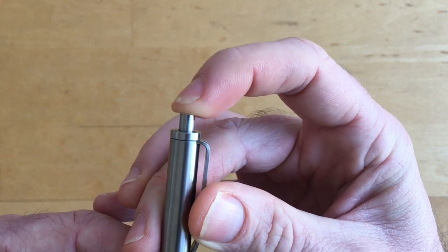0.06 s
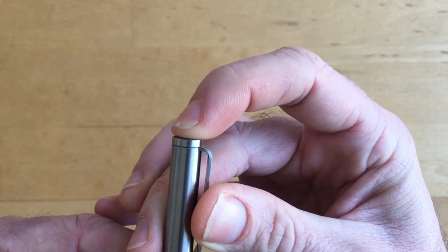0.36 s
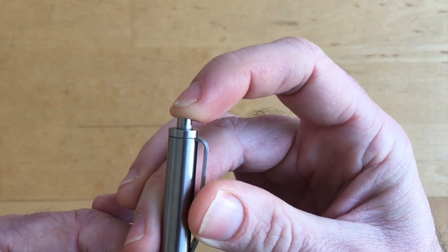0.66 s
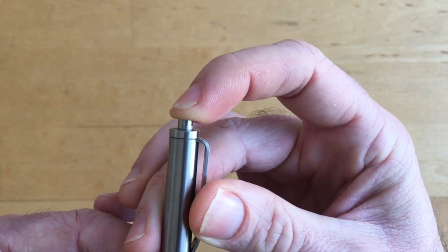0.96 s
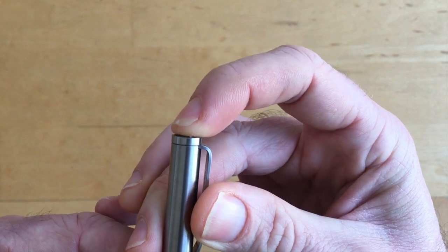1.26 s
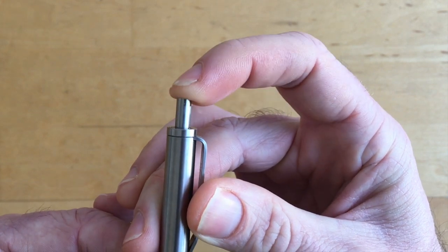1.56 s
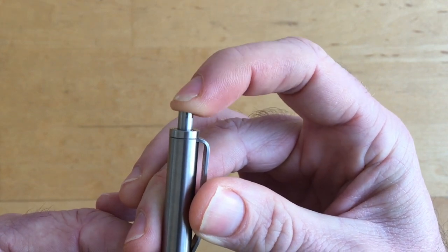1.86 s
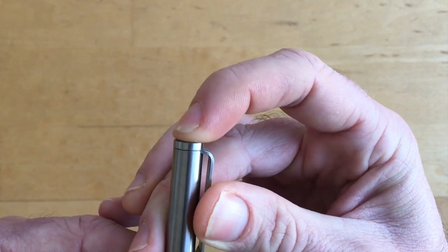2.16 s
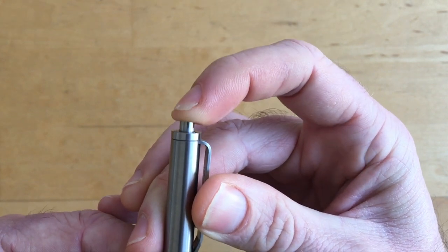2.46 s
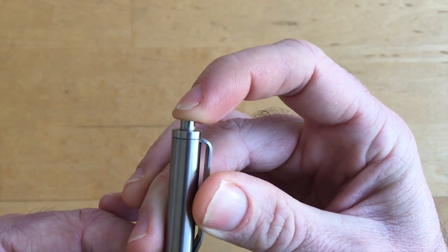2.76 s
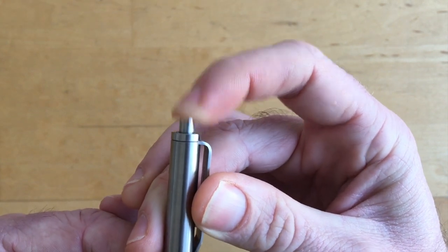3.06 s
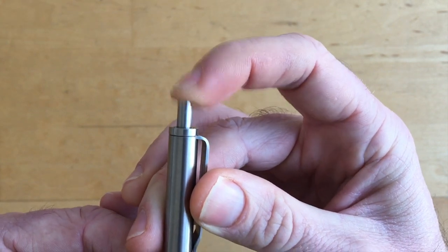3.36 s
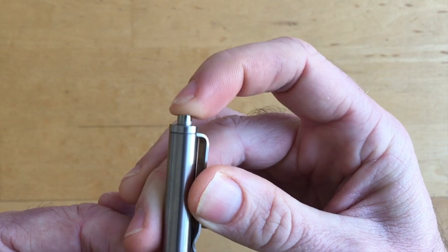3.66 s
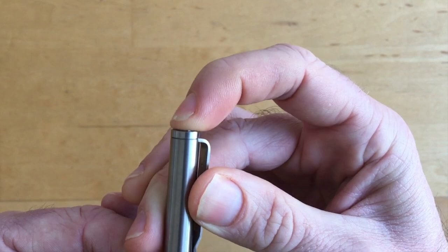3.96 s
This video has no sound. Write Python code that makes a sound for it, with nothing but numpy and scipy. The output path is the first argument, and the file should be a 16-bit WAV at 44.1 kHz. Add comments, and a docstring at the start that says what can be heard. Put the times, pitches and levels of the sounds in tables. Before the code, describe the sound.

Sharp clicks come from a metal pen near the microphone as a finger works the plunger, with brief scrapes and thin sliding hisses in between. The quiet room holds a steady airy rush, a low hum and a drifting rumble.

```python
"""A short scrape and a thin hiss, then a sharp click: a finger works a metal click pen near the mic.
The plunger hisses as it slides and its cam scrapes over the teeth; on release it snaps onto the
latch or jumps to its top stop. Behind it lies a quiet room, heard in mono: a steady rush like
ventilation, a low hum and a rumble that swells and fades."""
import sys
import numpy as np
from scipy import signal
from scipy.fft import rfft, irfft
from scipy.io import wavfile

SR = 44100
rng = np.random.default_rng(int(sys.argv[2]) if len(sys.argv) > 2 else 0)


def file_out(sig):
    """Save sig as 16-bit WAV at sys.argv[1]."""
    # one column per channel
    cols = np.atleast_2d(sig).T
    # limit, then scale
    lim = np.clip(cols, -1, 1)
    pcm = np.round(lim * 32767).astype(np.int16)
    wavfile.write(sys.argv[1], SR, pcm)


N = 176400

# The latch snaps, close up. Each row: start in seconds, level in dB, treble tilt in dB per octave.
LATCH_SNAPS = [(0.577, -51.5, -1), (2.4819, -52.5, 0.5), (3.7306, -54.5, -2)]
# Rebounds, the later one duller. Each row, relative to its snap: delay in seconds, level in dB,
# treble tilt in dB per octave.
LATCH_REBOUNDS = [(.0015, -8, 1), (.0052, -11, -7)]
# The ring of the latch. Each row: frequency in Hz, relative level in dB, seconds to fall 60 dB.
LATCH_RING = [(1700, -1, 0.011), (2530, -16, 0.0089), (3010, -4, 0.0088), (3720, -12, 0.0067),
              (4340, -1.5, 0.0072), (5500, -1.5, 0.0065), (6020, -2.5, 0.0053), (6800, -5, 0.0058),
              (8700, -16, .005), (14000, -11, 0.0044), (15000, -14, .004)]
def latch_clicks(contact_s=0.0006):
    """The cam snaps onto the latch and rebounds twice, ringing the pen each time."""
    out = np.zeros(N)
    for start, db, tilt_db in LATCH_SNAPS:
        add(out, start, amp(db) * struck_pen(LATCH_RING, contact_s, tilt_db, size=512))
        for delay, rebound_db, rebound_tilt_db in LATCH_REBOUNDS:
            rebound = struck_pen(LATCH_RING, contact_s, tilt_db + rebound_tilt_db, size=512)
            add(out, start + delay, amp(db + rebound_db) * rebound)
    return out


# A graze, then the hit on the stop. Each row: start in seconds, level in dB, tilt in dB per octave.
STOP_HITS = [(3.1884, -64, 15), (3.1895, -46, -1)]
# The ring of the stop. Each row: frequency in Hz, relative level in dB, seconds to fall 60 dB.
STOP_RING = [(920, -2.5, .01), (1590, -5, .008), (2050, -1.5, .017), (2250, -4.5, 0.013),
             (3800, -2, 0.0033), (5600, -3.5, 0.0058), (6860, -12, .004), (8900, -12, .004),
             (12200, -10, .003), (13500, -13, .004), (15200, -11, .003)]
def top_stop(contact_s=0.0008):
    """The spring throws the plunger against its stop: a lower, rounder click."""
    out = np.zeros(N)
    for start, db, tilt_db in STOP_HITS:
        add(out, start, amp(db) * struck_pen(STOP_RING, contact_s, tilt_db, size=640))
    return out


def struck_pen(modes, contact_s, tilt_db, size, crack_db=-9.5, crack_s=0.0016):
    """Damped modes of the pen in the hand, struck once, with a brief gritty crack; rms 1."""
    t = np.arange(size) / SR
    hz, db, t60 = np.transpose(modes)[:, :, None]
    polarity = (-1) ** np.arange(len(hz))[:, None]
    decays = amp(db + tilt_db * np.log2(hz / hz.mean()) - 60 * t / t60)
    ring = (polarity * decays * np.sin(2 * np.pi * hz * t)).sum(0)
    crack = amp(crack_db) * colour(rng.standard_normal(size), SCRAPE_SPECTRUM) * np.exp(-t / crack_s)
    attack = np.minimum(t / contact_s, 1)
    return unit((ring + crack) * attack)


# The cam on the teeth, close up. Each row: start in seconds, length in seconds, level in dB,
# barrel resonance in Hz, its level against the scrape in dB.
TOOTH_SCRAPES = [(0.083, 0.0031, -56.5, 3700, -5), (0.086, 0.029, -66.5, 3700, -2),
                 (1.4446, 0.0062, -52.5, 9000, -2), (1.452, 0.0034, -55, 3750, -11),
                 (1.459, 0.0034, -59, 9000, -9), (1.906, 0.0085, -61.5, 6900, -16),
                 (1.929, 0.0099, -62, 3300, -1), (1.956, .005, -67, 6000, -9),
                 (3.1785, .002, -51, 3800, -5), (3.1812, 0.0027, -46.5, 13300, 7.5),
                 (3.476, .0035, -50.5, 6700, -7), (3.479, 0.0051, -53, 7600, -1),
                 (3.483, .003, -64, 10200, -2)]
# The colour of a scrape and of a click's crack. Each row: frequency in Hz, relative level in dB.
SCRAPE_SPECTRUM = [(1200, -25), (2400, -2.5), (3500, 2.5), (4900, -4.5), (5800, -2), (6900, 2), (8100, -8),
                   (9200, -3.5), (11300, -4.5), (13600, -32), (15500, -7.5)]
def cam_scrapes():
    """The cam chatters briefly over a tooth, each scrape favouring one resonance of the barrel."""
    out = np.zeros(N)
    for start, length, db, hz, ring_db in TOOTH_SCRAPES:
        chatter = impulses(per_s=5000)
        barrel = amp(ring_db) * resonance(chatter, hz, width_hz=450)
        scrape = unit(colour(chatter, SCRAPE_SPECTRUM) + barrel)
        add(out, start, amp(db) * stroke(scrape, length, edge_s=0.0011))
    return out


# The plunger's travel, faint even this close. Each row: start and length in seconds, level in dB.
SLIDE_STROKES = [(.073, 0.017, -63), (0.105, .02, -73), (0.173, 0.0094, -63.5), (0.182, .014, -67),
                 (.203, .022, -75), (0.245, 0.016, -67), (0.558, 0.023, -68), (1.143, .014, -67.5),
                 (1.173, .013, -65.5), (1.388, 0.048, -68.5), (1.446, 0.015, -65), (1.898, .016, -64),
                 (1.931, .008, -67), (2.04, 0.017, -65.5), (2.057, .026, -72), (2.114, .012, -64),
                 (2.459, 0.021, -70), (2.932, .014, -66), (2.944, .015, -66), (3.144, 0.031, -67),
                 (3.192, .024, -85), (3.467, .018, -63), (3.505, 0.03, -64), (3.712, .021, -66.5),
                 (3.976, 0.034, -66.5)]
# The colour of sliding metal. Each row: frequency in Hz, relative level in dB.
SLIDE_SPECTRUM = [(1500, -22), (3000, -8), (4150, -5.5), (5000, -14), (5900, -4), (7800, -17.5), (9100, -8),
                  (10500, -13), (12600, -5), (13550, 4), (14200, -5), (15000, -3), (16000, -10)]
def plunger_slides():
    """Metal catches on metal as the plunger moves in the barrel: a thin, bright hiss."""
    out = np.zeros(N)
    for start, length, db in SLIDE_STROKES:
        hiss = colour(impulses(per_s=3500), SLIDE_SPECTRUM)
        add(out, start, amp(db) * stroke(hiss, length, edge_s=0.0034))
    return out


def room_reflections(x, db=-14.5, t60_s=0.18, build_s=0.0047, size=12000):
    """The room returns a faint, short tail of sparse reflections to the microphone."""
    t = np.arange(size) / SR
    tail = impulses(per_s=3000, size=size) * amp(-60 * t / t60_s) * np.minimum(t / build_s, 1)
    return amp(db) * signal.fftconvolve(x, tail / np.linalg.norm(tail))[:N]


# Room tone behind the pen. Each row: frequency in Hz, relative noise density in dB.
RUSH_SPECTRUM = [(20, -40), (60, -15), (112, -14), (146, -7.5), (170, -12), (195, -10), (228, -10.5),
                 (255, -10.5), (274, -15), (320, -15.5), (400, -18.5), (520, -25), (640, -20), (920, -17),
                 (1080, -18.5), (1320, -18.5), (1650, -25.5), (2050, -32.5), (2550, -39), (2950, -44),
                 (3200, -42), (4100, -44), (4900, -49), (5400, -47), (6800, -49), (7700, -51), (8300, -50),
                 (9900, -50.5), (10400, -57), (10900, -51.5), (12700, -52.5), (15800, -57)]
def room_rush(db=-49.5):
    """A steady, broad noise like ventilation."""
    return amp(db) * colour(rng.standard_normal(N), RUSH_SPECTRUM)


# The drift of the room's bass. Each row: time in seconds, level in dB.
RUMBLE_DRIFT = [(0, -48.5), (.7, -49.5), (1.3, -48), (2, -50), (2.6, -49.5), (2.85, -55.5), (3.5, -53),
                (3.9, -49.5)]
# Its colour. Each row: frequency in Hz, relative noise density in dB.
RUMBLE_SPECTRUM = [(18, -48), (27, -22), (36, -11), (45, 0), (58, -2), (79, -11), (92, -5.5), (112, -14),
                   (200, -45), (600, -90)]
def room_rumble():
    """Deep noise whose level drifts slowly."""
    level_db = np.interp(np.arange(N) / SR, *np.transpose(RUMBLE_DRIFT))
    return amp(level_db) * colour(rng.standard_normal(N), RUMBLE_SPECTRUM)


# The hum in the room. Each row: frequency in Hz, width in Hz, level in dB.
HUM_TONES = [(46.1, 3.3, -53.5), (96.7, 3.2, -62), (136, 3.1, -56), (247.5, 9.7, -60.5),
             (290.3, 5.06, -65.5), (357.2, 7.88, -68)]
def room_hum():
    """Low, wavering tones that sound throughout."""
    return sum(amp(db) * drone(hz, width_hz) for hz, width_hz, db in HUM_TONES)


# Swells at the back of the scene. Each row: peak time and half length in seconds,
# frequency and width in Hz, level at the peak in dB.
LOW_SWELLS = [(1.15, 0.33, 70.3, 2, -48.5), (1.1, .19, 97.5, 1.87, -48), (1.79, 0.097, 73, 3.7, -47),
              (0.12, .17, 98, 3, -50)]
def rumble_swells():
    """Low tones that rise and fade along a bell curve."""
    t = np.arange(N) / SR
    out = np.zeros(N)
    for peak_s, half_s, hz, width_hz, db in LOW_SWELLS:
        swell = np.exp(-.5 * ((t - peak_s) / half_s) ** 2)
        out += amp(db) * swell * drone(hz, width_hz)
    return out


def drone(hz, width_hz, waver_db=3):
    """A low tone that wavers in pitch and level; rms 1."""
    drift, waver = (resonance(rng.standard_normal(N), 0, width_hz) for _ in range(2))
    turns = np.cumsum(hz + .5 * width_hz * drift) / SR + rng.random()
    return unit(np.sin(2 * np.pi * turns) * amp(waver_db * waver))


def impulses(per_s, size=4096):
    """A train of tiny impulses, random in sign, strength and timing."""
    return rng.choice([-1, 1], size) * rng.uniform(0.6, 1, size) * (rng.random(size) < per_s / SR)


def stroke(x, length_s, edge_s):
    """Attack, hold and release of a short rub."""
    t = np.arange(len(x)) / SR
    return x * np.minimum(t / edge_s, 1) * np.exp(-np.maximum(t - length_s, 0) / edge_s)


def colour(x, points):
    """Filters by a (Hz, dB) curve; rms 1."""
    hz, db = np.transpose(points)
    f = np.fft.rfftfreq(len(x), 1 / SR)
    gain = amp(np.interp(np.log(f + 1), np.log(hz + 1), db))
    return unit(irfft(rfft(x) * gain, len(x)))


def resonance(x, hz, width_hz):
    """One steep-sided resonance; rms 1."""
    f = np.fft.rfftfreq(len(x), 1 / SR)
    return unit(irfft(rfft(x) / (1 + 1j * (f - hz) / width_hz) ** 2, len(x)))


def amp(db):
    return 10 ** (np.asarray(db) / 20)


def unit(x):
    return x / np.sqrt(np.mean(x ** 2) + 1e-20)


def add(mix, start_s, sound):
    part = mix[max(round(start_s * SR), 0):][:len(sound)]
    part += sound[:len(part)]


def scene():
    """One microphone, the pen close by and the room behind it."""
    pen = latch_clicks() + top_stop() + cam_scrapes() + plunger_slides()
    reflections = room_reflections(pen)
    background = room_rush() + room_rumble() + room_hum() + rumble_swells()
    return (pen + reflections + background)[None]


def record(dry, cutoff_hz=15900):
    """The recorder's band limit cuts the highest treble."""
    lowpass = signal.firwin(511, cutoff_hz, window=("kaiser", 9), fs=SR)
    return signal.oaconvolve(dry, lowpass[None], "same")


dry = scene()
out = record(dry)
file_out(out)
```